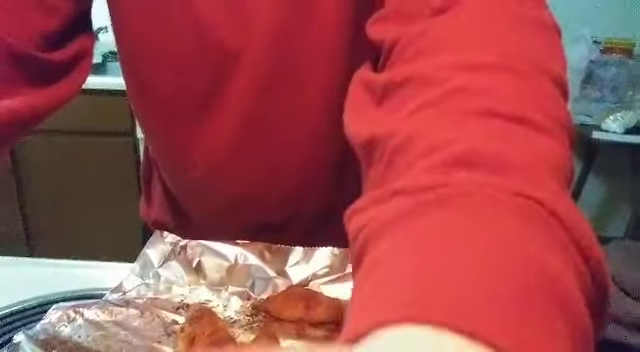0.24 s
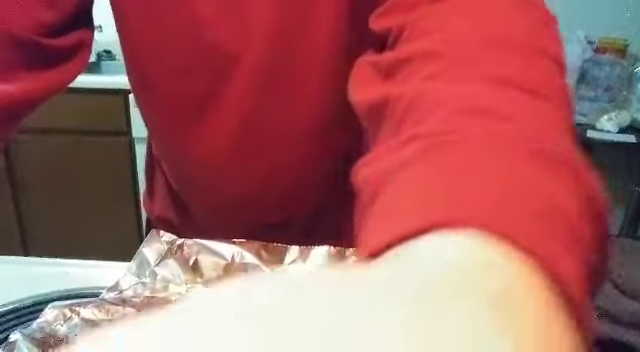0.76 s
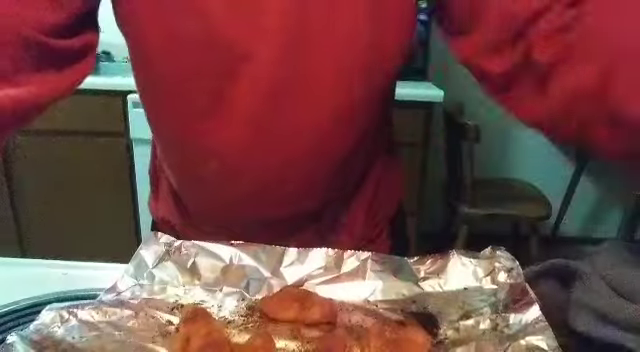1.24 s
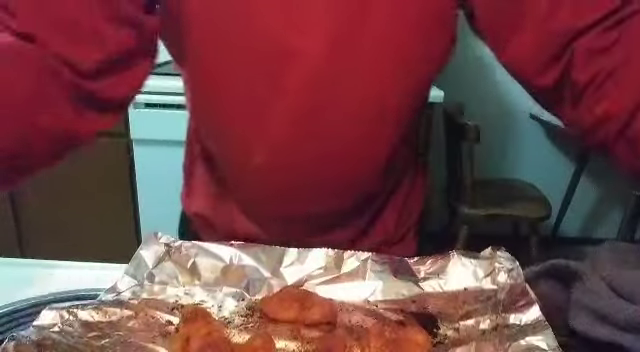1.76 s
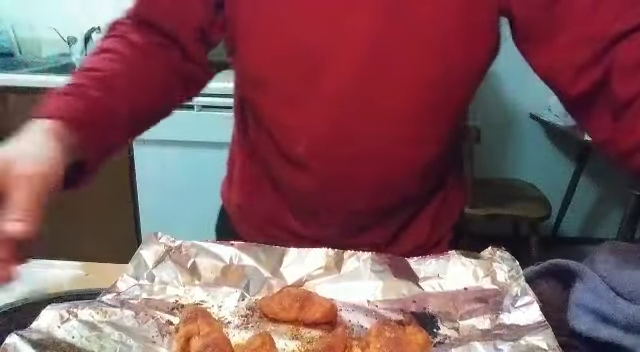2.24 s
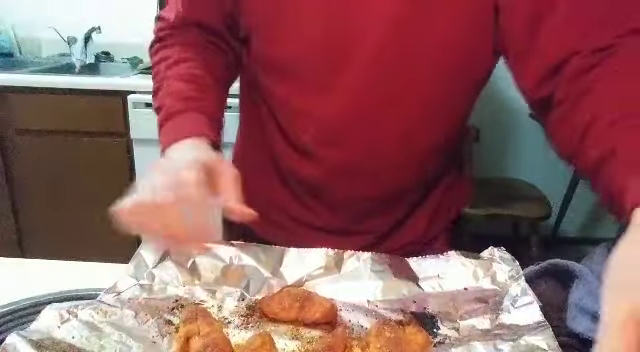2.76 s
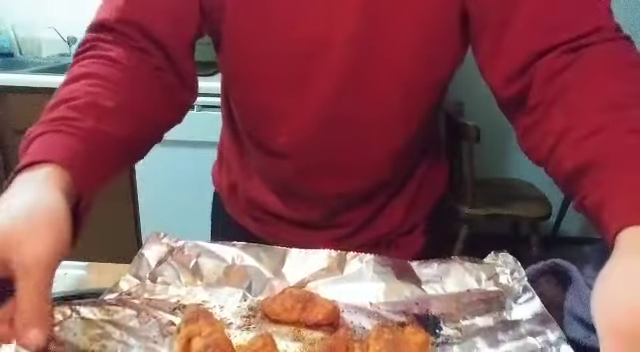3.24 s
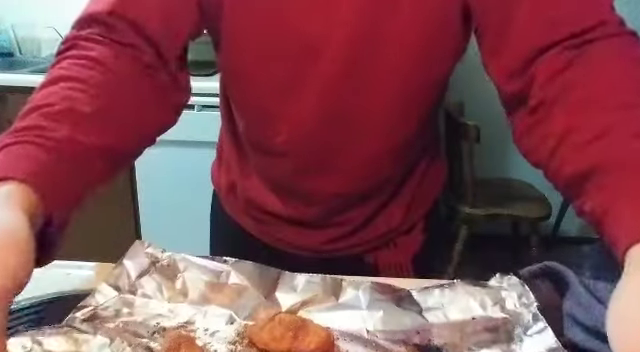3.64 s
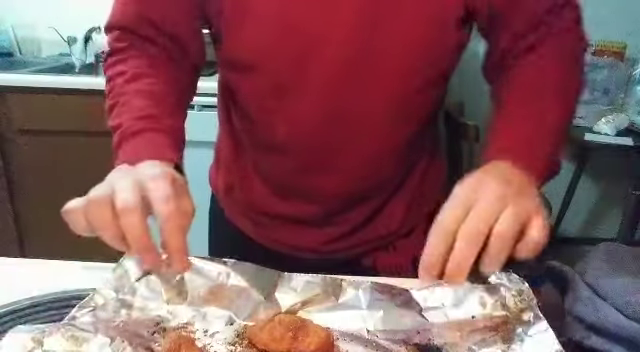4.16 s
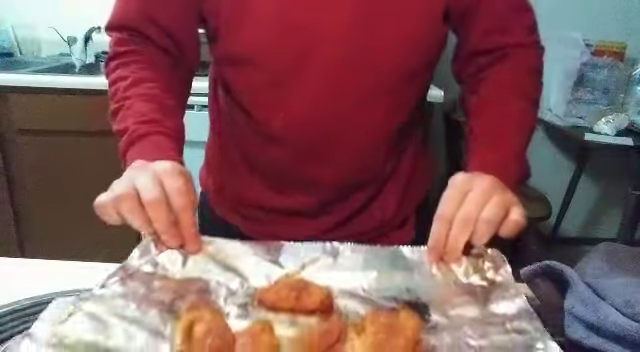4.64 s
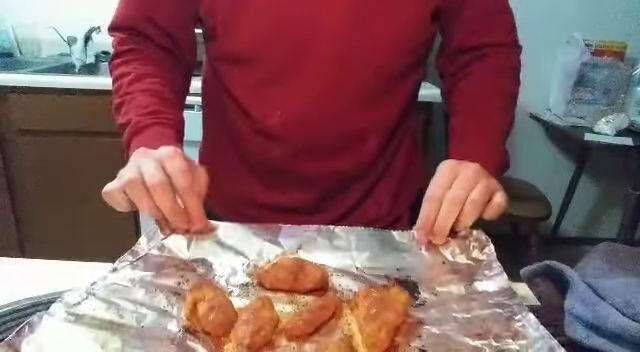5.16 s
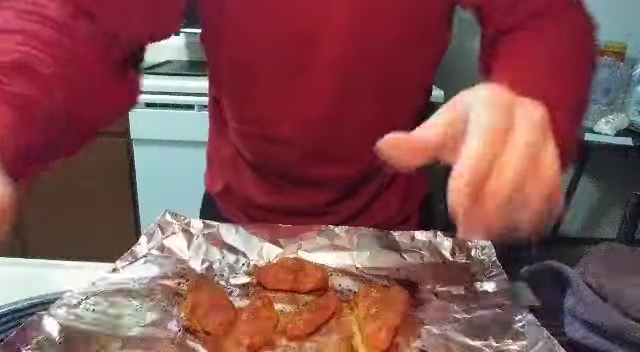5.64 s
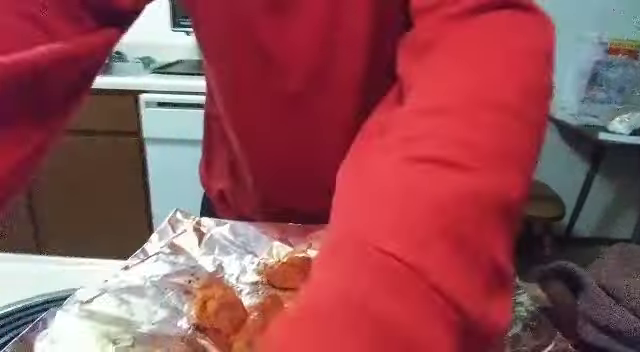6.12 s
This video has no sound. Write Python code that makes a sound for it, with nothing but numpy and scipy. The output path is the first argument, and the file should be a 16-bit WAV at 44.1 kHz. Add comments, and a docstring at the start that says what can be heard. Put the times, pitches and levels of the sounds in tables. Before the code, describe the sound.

A small kitchen, heard close, with soft air noise and a faint wavering fridge-like hum throughout. From 0 to 1.6 s it is nearly quiet, with a few faint foil ticks and dull taps, clearest around 1.07 s. At about 1.64 s a metal pan is knocked and dragged on a hob: quick clatter, the hardest bright clank near 1.9 s, then a gritty ringing scrape with short wavering squeaks until 2.3 s. A lighter knock and popping tap come at 2.5 s. One foil snap sounds at 2.88 s, then dense crisp crackling from 3.1 to 3.9 s. After a short dip, creases resume at 4.15 s, bursting strongest around 4.45 to 4.6 s while the tray slides with a fading metallic resonance until 5 s. Scattered snaps continue to 5.3 s; then quiet, with a tiny crackle and soft tap near 6.2 s. A short room tail follows loud sounds.

```python
"""Foil bent on a baking tray

Hands bend aluminium foil in a small kitchen: snaps sound as decaying noise runs over a lumpy crackle.
Earlier a metal pan is dragged and knocked on a hob, later the tray slides: noise drives their resonances.
Squeaks are short wavering tones, taps are damped notes with puffs and clicks; air noise and a fridge-like
hum lie beneath. A short room tail follows the loud near sounds."""
import sys
import numpy as np
from scipy import signal
from scipy.fft import rfft, irfft, next_fast_len
from scipy.io import wavfile
from scipy.ndimage import uniform_filter1d, map_coordinates

SR = 44100
rng = np.random.default_rng(int(sys.argv[2]) if len(sys.argv) > 2 else 0)


def unload_wav(signal):
    """Save mono or channel-first audio to the path in sys.argv[1] as 16-bit WAV at rate SR, clipped to [-1, 1]."""
    wavfile.write(
        sys.argv[1],
        SR,
        np.round(np.clip(np.atleast_2d(signal).T, -1, 1) * 32767).astype(np.int16),
    )


N = 281710
EVENT_SAMPLES = SR // 4  # room for one short event

# Spectrum of crackling foil. Each row: frequency in Hz, relative density in dB per Hz.
FOIL_SPECTRUM = [(1760, -40), (3000, -11), (4190, -10.5), (4550, -11), (4950, -6.5), (5850, -5),
                 (8160, 1.5), (11900, -19), (15800, -27)]
# Spectrum of the broad sheet flexing. Each row: frequency in Hz, relative density in dB per Hz.
SHEET_SPECTRUM = [(180, -72), (300, -16), (560, -8.5), (1180, -11.5), (1460, -6.5), (2950, -7.5),
                  (4000, -9.5), (5200, -9.5), (8800, -120)]


def amp(db):
    """Gain of a level in dB."""
    return 10 ** (np.asarray(db) / 20)


def unit(x):
    """x at rms 1."""
    return x / np.sqrt(np.mean(x ** 2) + 1e-20)


def along(points, hz):
    """(Hz, value) points interpolated on a log frequency axis."""
    point_hz, values = np.transpose(points)
    return np.interp(np.log(hz + 1), np.log(point_hz + 1), values)


def wobble(knots_per_s):
    """A smooth random curve through normally distributed knots."""
    at = np.arange(0, N + 16, 16)
    knots = rng.standard_normal(int(N * knots_per_s / SR) + 4)
    coarse = map_coordinates(knots, [at * knots_per_s / SR])
    return np.interp(np.arange(N), at, coarse)


def filtered(x, response):
    """x times a complex response of frequency."""
    size = next_fast_len(len(x) + 8192)
    spectrum = rfft(x, size) * response(np.fft.rfftfreq(size, 1 / SR))
    return irfft(spectrum, size)[:len(x)]


def modes(table):
    """Response of resonances (Hz, width Hz, dB), summed with alternating sign."""
    def response(f):
        return sum((-1) ** k * amp(db) * 1j * f * width / (hz * hz - f * f + 1j * f * width)
                   for k, (hz, width, db) in enumerate(table))
    return response


def colour(points):
    """Gain over frequency of a (Hz, dB) spectrum."""
    return lambda hz: amp(along(points, hz))


def noise(response, patchy_db=0, size=N):
    """Coloured noise of rms 1 with small time-frequency patches of random gain."""
    z = signal.stft(rng.standard_normal(size), nperseg=256)[2]
    patches = uniform_filter1d(rng.standard_normal(z.shape), 3, 0)
    patches = uniform_filter1d(patches, 4, 1)
    patchy = signal.istft(z * amp(patchy_db * unit(patches)), nperseg=256)[1][:size]
    return unit(filtered(patchy, response))


def burst(t60_s, rise_s, bend=1.5):
    """A rise and a fall to -60 dB at t60; the fall in dB speeds up where bend exceeds 1."""
    t = np.arange(EVENT_SAMPLES) / SR
    return (1 - np.exp(-t / rise_s)) * amp(-60 * (t / np.clip(t60_s, .002, 1)) ** bend)


def add(track, start_s, sound):
    """Mix a sound into a track."""
    at = round(start_s * SR)
    track[at:at + len(sound)] += sound[:N - at]


def curve(rows):
    """One gain per sample from (s, dB) rows, -120 dB outside them."""
    s, db = np.transpose(rows)
    return amp(np.interp(np.arange(N) / SR, s, db, -120, -120))


def stroke(corner_1_s, corner_2_s, corner_3_s, corner_4_s, db, fall_db):
    """Gain of a movement through four corners: low, full, full and fallen, then a quick stop."""
    return curve([(corner_1_s, db - 29.5), (corner_2_s, db), (corner_3_s, db),
                  (corner_4_s, db - fall_db), (corner_4_s + 0.043, db - fall_db - 22)])


def rung(force, table, widen=1):
    """A force rings resonances that swell and fade singly; steady white force of rms 1 gives about rms 1."""
    shift_db, shift_per_s = 2, 18  # the point of contact wanders
    table = [(hz, widen * width, db) for hz, width, db in table]
    ring = np.zeros(N)
    for k, mode in enumerate(table):
        swell = unit(amp(shift_db * wobble(shift_per_s)))
        ring += (-1) ** k * swell * filtered(force, modes([mode]))
    power = np.abs(modes(table)(np.linspace(1, SR / 2, 4096))) ** 2
    return ring / np.sqrt(np.mean(power))


def background():
    """Steady air noise and the unsteady hum of an appliance, as sines of wandering pitch and level."""
    # Spectrum of the air noise. Each row: frequency in Hz, relative density in dB per Hz.
    air_spectrum = [(25, -53), (43, -22), (84, -16), (165, -3), (235, -1), (261, -8), (449, -7.5),
                    (513, -14), (691, -12.5), (791, -11), (857, -12), (1010, -18.5), (7830, -37.5),
                    (15800, -47)]
    # Hum partials. Each row: mean frequency in Hz, level in dB before a fixed lift and wobble.
    hum_partials = [(178, -69.5), (208, -69), (447, -67), (672, -71), (1061, -77)]
    air_db = -58.5
    hum = np.zeros(N)
    for hz, db in hum_partials:
        level = amp(db + 2.5 + 1.8 * wobble(14))
        hum += level * np.sin(2 * np.pi * np.cumsum(hz + 4 * wobble(25)) / SR)
    return amp(air_db + 2.0 * wobble(3.103)) * noise(colour(air_spectrum), 0.74) + hum


def kitchen(x):
    """Room tail of shaped noise: each frequency dies at its own speed."""
    # Reverberation of the room. Each row: frequency in Hz, t60 in seconds.
    room_t60 = [(200, 0.28), (2000, 0.33), (10000, 0.1)]
    hz, t, z = signal.stft(rng.standard_normal(SR // 2), SR, nperseg=256)
    decay = amp(-60 * t / along(room_t60, hz)[:, None])
    tail = signal.istft(z * decay, SR, nperseg=256)[1]
    delayed = np.pad(x, (300, 0))  # samples
    return signal.fftconvolve(delayed, tail / np.linalg.norm(tail))[:N]


def taps():
    """Soft contacts and popping panels: a damped note that sags as contact relaxes, a dull puff, a click."""
    # Taps. Each row: start in seconds, level in dB, starting pitch in Hz.
    tap_rows = [(.365, -46.5, 900), (.459, -45, 683), (.816, -48.5, 590), (.983, -46.5, 3350),
                (1.065, -34, 470), (1.716, -38, 333), (1.925, -37.5, 160), (2.008, -29, 487),
                (2.284, -35, 642), (2.366, -44.5, 1590), (2.509, -32.5, 2565), (2.509, -31, 687),
                (3.2397, -30.5, 3440), (4.205, -37, 430), (4.365, -33, 1480), (4.52, -24.5, 2400),
                (5.193, -37.5, 1792), (5.287, -41.5, 660), (5.319, -40, 475), (6.222, -41, 430)]
    click_db, click_t60_s = -8, 0.0044
    out, t = np.zeros(N), np.arange(EVENT_SAMPLES) / SR
    for s, db, hz in tap_rows:
        body = modes([(.9 * hz, 1.1 * hz, 0)])
        puff = noise(lambda f: body(f) ** 2, size=EVENT_SAMPLES)
        note = np.sin(2 * np.pi * hz * t * (1 - 4 * t))
        edge = noise(lambda f: f / (f + hz) / (1 + (f / 5000) ** 4), size=EVENT_SAMPLES)
        click = amp(click_db) * burst(click_t60_s, 0.00016, 0.81) * edge
        add(out, s, amp(db) * (burst(0.039, 0.0005, 1.08) * (note + 0.71 * puff) + click))
    return out


def tray():
    """Sliding friction, as fitful noise, sings in the low modes of the tray; it begins abruptly and fades."""
    # The tray slide: four corner times of its level in seconds, not in rising order, then force in dB
    # and fall in dB.
    slide = (4.5, 4, 4, 5, -38, 11)
    # Tray modes. Each row: frequency in Hz, width in Hz, relative level in dB.
    tray_modes = [(740, 64, -8.5), (1431, 46, 0), (1780, 330, -8), (2000, 140, -1), (2146, 49, -4)]
    fits = unit(amp(1.1 * wobble(45)))
    friction = stroke(*slide) * fits * noise(np.ones_like, patchy_db=1.5)
    return rung(friction, tray_modes)


def squeaks():
    """Metal sticks and slips on one note: short sines of slightly unsteady pitch and level."""
    # Squeaks. Each row: start in seconds, length in seconds, mean pitch in Hz, level in dB before a lift.
    squeak_rows = [(1.639, 0.076, 2700, -64.5), (1.715, 0.062, 847, -52), (1.735, 0.032, 6720, -53),
                   (1.763, 0.065, 727, -41.5), (1.839, .06, 740, -46), (1.932, 0.021, 2736, -45),
                   (2.05, 0.041, 2967, -40.5), (2.078, 0.0314, 817, -36.5), (2.091, 0.013, 5380, -33),
                   (2.167, 0.029, 852, -38.5), (4.657, 0.027, 1387, -37.5)]
    out, waver, flutter = np.zeros(N), 1 + 0.01 * wobble(70), amp(2.2 * wobble(90))
    for s, length_s, hz, db in squeak_rows:
        at, size = round(s * SR), round(length_s * SR)
        tone = np.sin(2 * np.pi * hz * np.cumsum(waver[at:at + size]) / SR)
        add(out, s, amp(db + 4.0) * signal.windows.tukey(size, .5) * tone)
    return out * flutter


def pan():
    """Grit under the moving pan drives its rim and base as noise; blows do the same in short bursts."""
    # Force of the grit on the rim. Each row: time in seconds, force in dB.
    drag = [(1.62, -81), (1.73, -60.5), (1.88, -54), (1.97, -42.5), (2.07, -34.5), (2.13, -41.5),
            (2.2, -43), (2.32, -64.5), (2.4, -95)]
    # Blows. Each row: start in seconds, level in dB before scaling to a force, force t60 in seconds.
    blow_rows = [(1.635, -25.5, 0.019), (1.655, -28, 0.032), (1.7787, -19.5, 0.043), (1.788, -13.5, 0.032),
                 (1.804, -10.5, 0.036), (1.84, -25.5, .03), (1.8977, 1, .02), (1.902, 1.5, 0.022),
                 (1.915, -7.5, 0.032), (2.051, -35, 0.11), (2.166, -20, 0.03), (2.507, -21, 0.024)]
    # Modes of the rim, the base and the scrape. Each row: frequency in Hz, width in Hz, relative level in dB.
    rim_modes = [(2700, 35, -4), (4560, 87, -9.5), (5387, 70, -1.5), (5520, 81, -0.5), (6530, 200, -11),
                 (6770, 59, -3), (7140, 95, -6), (7450, 50, -8), (7620, 45, -3), (7750, 210, -13),
                 (8440, 180, -12), (10100, 60, -12.5)]
    base_modes = [(150.7, 93, 1), (444, 310, 2.5), (740, 45, 5), (826, 45, 8.5), (1280, 1900, -1)]
    scrape_modes = [(700, 49, 13), (1530, 70, 0.5), (1860, 80, 1.5), (2350, 65, -0.5), (2800, 200, 0),
                    (4700, 140, -7.5)]
    # Spectrum of the grit hiss. Each row: frequency in Hz, relative density in dB per Hz.
    grit_spectrum = [(600, -24), (1200, -27.5), (3000, -1.5), (5500, -3), (8000, -1.5), (10400, -5.5),
                     (15800, -53.5)]
    # Base rumble, then the last light scrape: start, full, easing and end in seconds, level in dB,
    # fall by the end in dB.
    rumble = (1.66, 1.77, 2.13, 2.35, -46, 14)
    settle = (2, 2.5, 2.5, 3, -53, 9)
    thud_db, thud_db_per_blow_db = -22.5, 0.65  # the thud grows less than the rim
    scrape_rim_db, settle_grit_db = -12, -14.5
    blow_damping = 1.6  # a blow presses the rim down and widens its modes

    drag_force, base_force = curve(drag), stroke(*rumble)
    settling = stroke(*settle)
    scrape = amp(scrape_rim_db) * drag_force + settling
    drag_force = drag_force * unit(amp(2.5 * wobble(54)))
    blows = np.zeros(N)
    for s, db, t60_s in blow_rows:
        add(blows, s, amp(db - 8.5) * burst(t60_s, 0.0032, 1.154))  # headroom for noise peaks
        add(base_force, s, amp(thud_db + thud_db_per_blow_db * db) * burst(t60_s, 0.0033, 1.28))

    grit = noise(np.ones_like, patchy_db=4.5)
    rim = rung(drag_force * grit, rim_modes) + rung(blows * grit, rim_modes, blow_damping)
    hiss_level = amp(-3.0) * drag_force + amp(-6.0) * blows + amp(settle_grit_db) * settling
    hiss = hiss_level * noise(colour(grit_spectrum), 4.2)
    body = filtered(base_force * noise(modes(base_modes)),
                    lambda hz: 1 / (1 + (110 / (hz + 1)) ** 8) / (1 + (hz / 2600) ** 4))
    # little is radiated above the top modes
    metal = filtered(rim + hiss + body, lambda hz: 1 / (1 + (hz / 10800) ** 20))
    return metal + rung(scrape * noise(np.ones_like, 2.2), scrape_modes)


def rustle():
    """Countless tiny buckles: short puffs of uneven size that overlap into a lumpy hiss."""
    # How hard the hands work the foil. Each row: time in seconds, crackle level in dB.
    bending = [(0, -70.5), (1.4, -73), (1.6, -85.5), (3.04, -69), (3.15, -67), (3.3, -45.5), (3.45, -39),
               (3.62, -41), (3.8, -49.5), (3.94, -47), (4.01, -67), (4.14, -74.5), (4.33, -56), (4.42, -44),
               (4.6, -36), (4.92, -40), (5.1, -44), (5.18, -61), (5.27, -45.5), (5.4, -70.5), (5.8, -78.5),
               (5.88, -63.5), (6.1, -69), (6.39, -66)]
    buckles_per_s, flex_db = 300, -2.5  # flexing sheet against the crackle
    sizes = amp(1.9 * rng.exponential(size=N).clip(0, 3.5))
    buckles = (rng.random(N) < buckles_per_s / SR) * sizes
    power = signal.fftconvolve(buckles ** 2, burst(0.02, 0.0004, 1) ** 2)[:N]
    lumps = unit(0.88 + np.sqrt(np.abs(power)))
    crackle = noise(colour(FOIL_SPECTRUM), 1.2)
    flexing = amp(flex_db) * noise(colour(SHEET_SPECTRUM), 3.0)
    return lumps * curve(bending) * (crackle + flexing)


def facet_noise(points, facets):
    """Noise of a spectrum, raised at the notes on which the facets ring."""
    return noise(lambda f: colour(points)(f) * (1 + np.abs(facets(f))), 3.0, size=EVENT_SAMPLES)


def snaps():
    """Creases give way in cracks and rattling runs, coloured with random notes of the facets beside them."""
    # Bursts of noise: snapping creases, and a faint burst at 4.15 s just ahead of the next snap. Each row:
    # start in seconds, level in dB before headroom, sheet against foil in dB, t60 of the run in seconds.
    burst_rows = [(0.367, -46, -8, 0.043), (0.727, -45.5, -18, 0.054), (0.9834, -37, -0.5, 0.032),
                  (1.0844, -45.5, -22, 0.05), (1.513, -38.5, 1.5, 0.051), (2.368, -40.5, -13, 0.031),
                  (2.8839, -21, -12, 0.063), (3.079, -32, -1.5, 0.13), (3.116, -22, -2, 0.084),
                  (3.1231, -21, -3, 0.031), (3.1909, -24, -8, 0.048), (3.202, -24.5, -14, 0.044),
                  (3.228, -21.5, -22.5, 0.04), (3.2393, -22, -7.5, 0.029), (3.2594, -21.5, -9.5, 0.071),
                  (3.3265, -21.5, -24, 0.049), (3.3319, -22.5, -8, 0.055), (3.3638, -19, -12, 0.044),
                  (3.4054, -18, -9, 0.058), (3.4365, -20.5, -9, 0.057), (3.444, -25, -3, 0.058),
                  (3.4993, -25, -4.5, 0.11), (3.5372, -21.5, -5.5, 0.11), (3.594, -24, -3, 0.11),
                  (3.6668, -27, -14.5, 0.081), (3.736, -15, -8.5, 0.053), (3.8175, -17, -15.5, 0.025),
                  (3.825, -18, -6, 0.15), (3.9759, -34.5, 1, 0.032), (4.15, -35, -1.5, 0.053),
                  (4.1645, -17, -8.5, 0.051), (4.2119, -26, -1, 0.13), (4.273, -26, -4.5, 0.091),
                  (4.372, -18.5, -13, 0.056), (4.4416, -10.5, -5.5, 0.069), (4.454, -9, -19.5, 0.021),
                  (4.485, -9.5, -4, 0.057), (4.5166, -9, -16.5, 0.067), (4.534, -12, -26, 0.026),
                  (4.567, -15.5, -23.5, 0.074), (4.643, -16.5, -11, 0.14), (4.7322, -17, -19, 0.11),
                  (4.9321, -17, -13, 0.04), (4.973, -16.5, -15, 0.05), (4.9877, -21.5, -4, 0.027),
                  (5.089, -26, -11, 0.046), (5.124, -25, -7, 0.054), (5.1907, -18.5, -15.5, 0.077),
                  (5.2022, -20, -8.5, 0.07), (5.2882, -28, -3.5, 0.14), (6.169, -40.5, -27.5, 0.034)]
    rise_per_t60_squared = 0.39  # a long run swells slowly (rise in s per s squared)
    crack_db, crack_t60_s = -0.4, .006  # first crack against the run
    out, rattle = np.zeros(N), amp(1.8 * wobble(420))
    for s, db, sheet_db, t60_s in burst_rows:
        notes_hz = 1300 * 7 ** np.sort(rng.random(size=6))
        facets = modes([(hz, 0.039 * hz, -2) for hz in notes_hz])
        run = burst(t60_s, rise_per_t60_squared * t60_s ** 2, 1.49)
        crack = amp(crack_db) * burst(crack_t60_s, 0.00018, 0.67)
        foil = facet_noise(FOIL_SPECTRUM, facets)
        sheet = amp(sheet_db) * facet_noise(SHEET_SPECTRUM, facets)
        add(out, s, amp(db - 12.0) * (run / run.max() + crack) * (foil + sheet))  # headroom for noise peaks
    return out * unit(rattle)


def scene():
    """Loud near sounds excite the room; soft taps and diffuse sounds are heard as they are."""
    near = snaps() + pan() + squeaks() + tray()
    return (near + amp(-8.5) * kitchen(near) + taps() + rustle() + background())[None]


def record(dry):
    """The microphone rolls off the treble and keeps nothing above its band limit."""
    top_hz, rolloff_hz = 15850, 12500
    return filtered(dry[0], lambda hz: (hz < top_hz) / (1 + (hz / rolloff_hz) ** 6))[None]


dry = scene()
out = record(dry)
unload_wav(out)
```